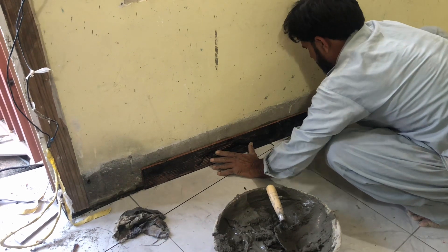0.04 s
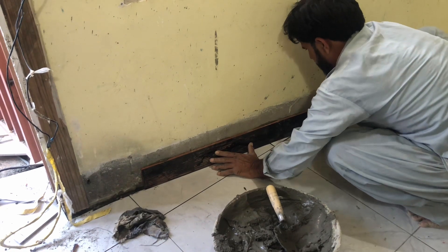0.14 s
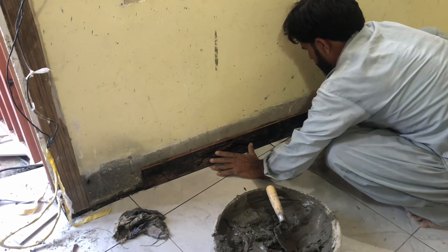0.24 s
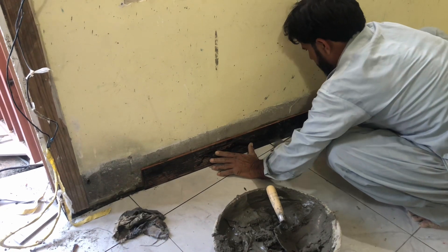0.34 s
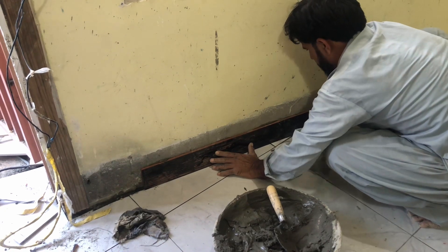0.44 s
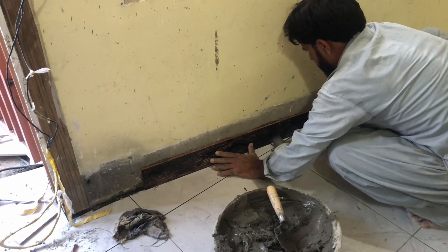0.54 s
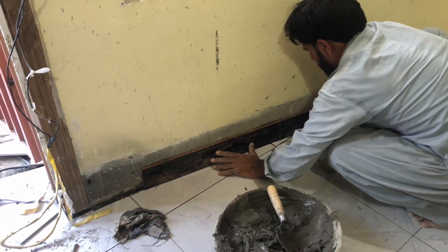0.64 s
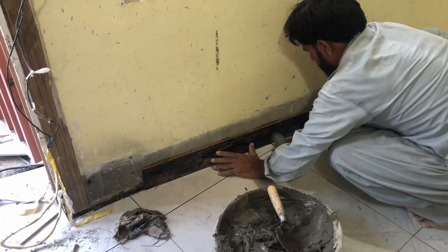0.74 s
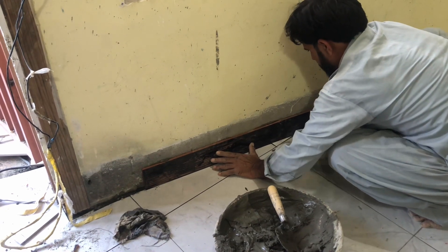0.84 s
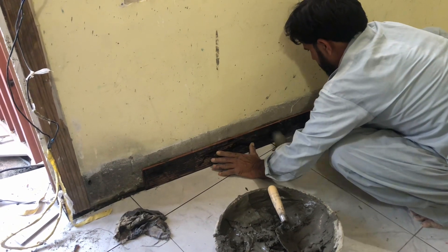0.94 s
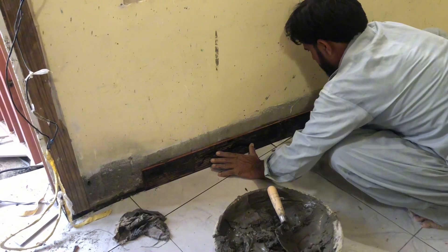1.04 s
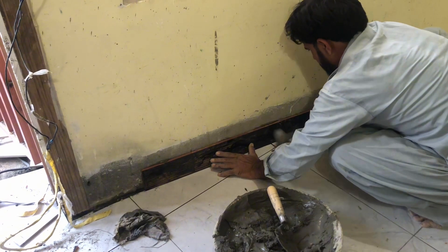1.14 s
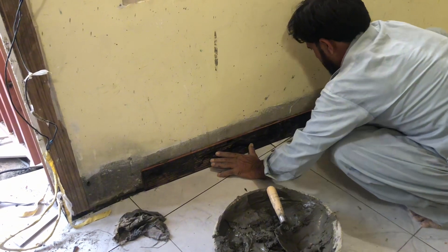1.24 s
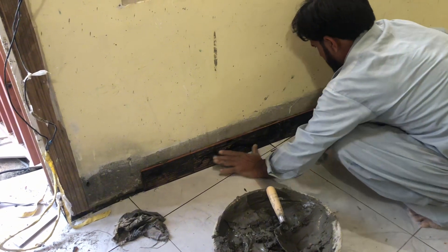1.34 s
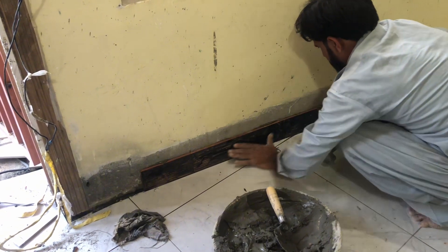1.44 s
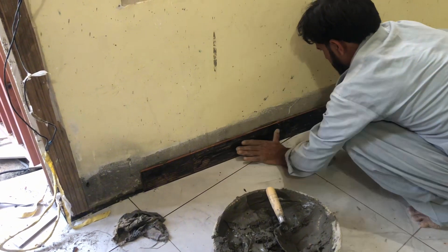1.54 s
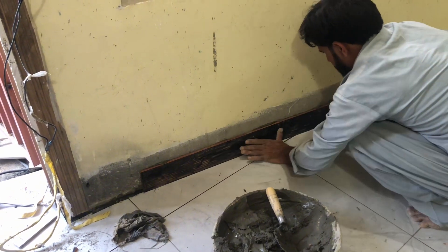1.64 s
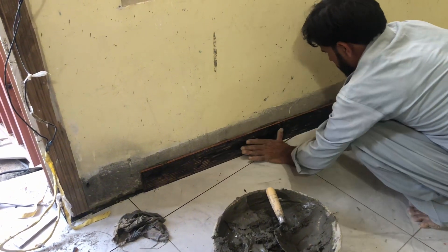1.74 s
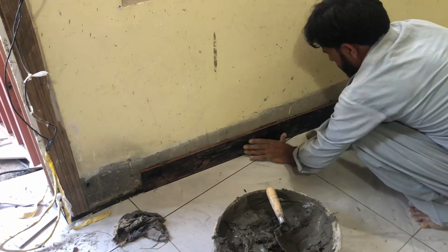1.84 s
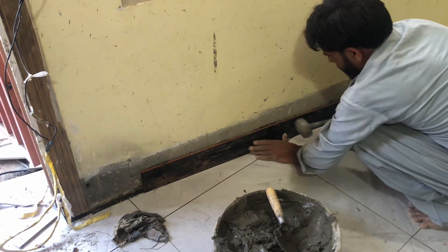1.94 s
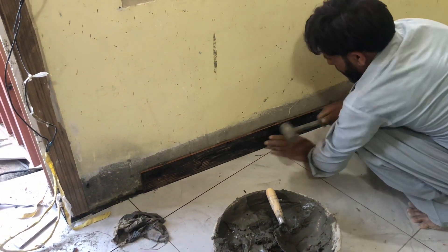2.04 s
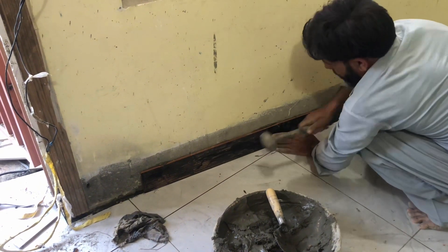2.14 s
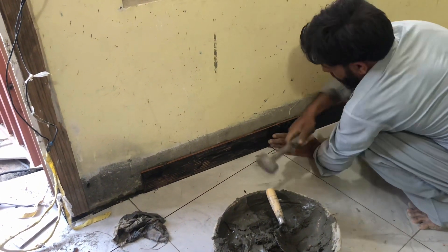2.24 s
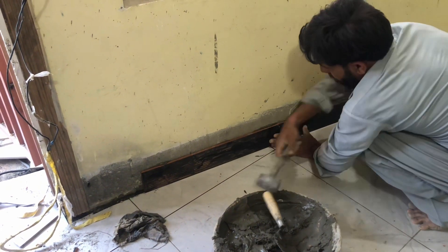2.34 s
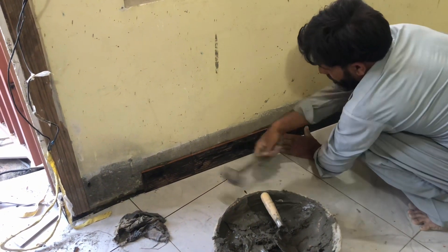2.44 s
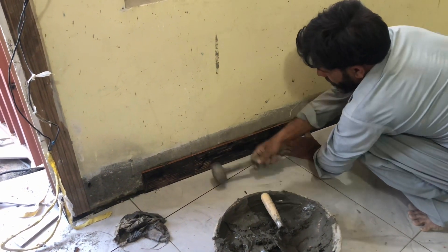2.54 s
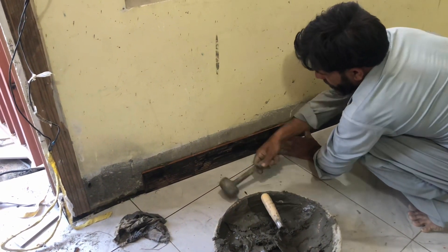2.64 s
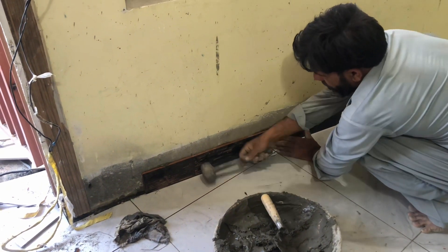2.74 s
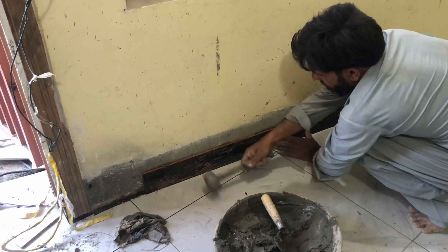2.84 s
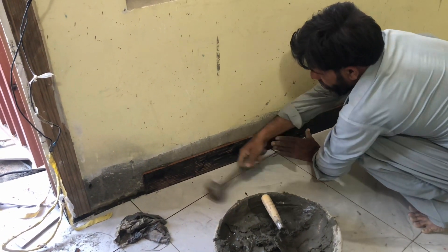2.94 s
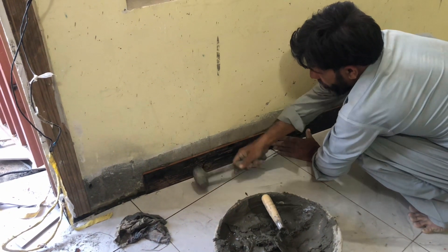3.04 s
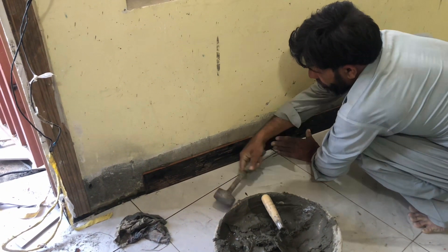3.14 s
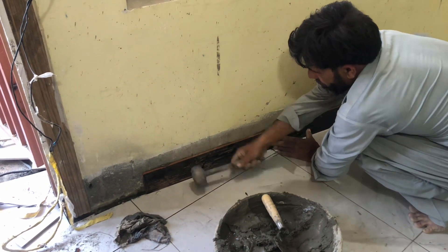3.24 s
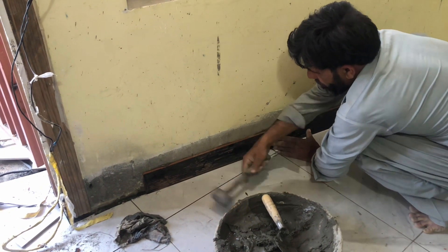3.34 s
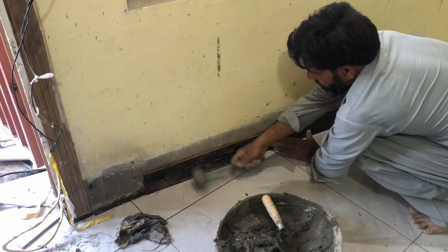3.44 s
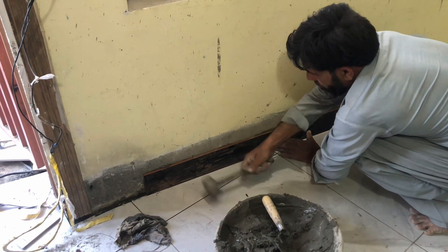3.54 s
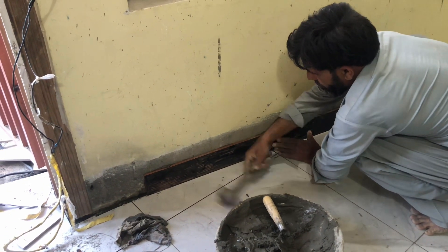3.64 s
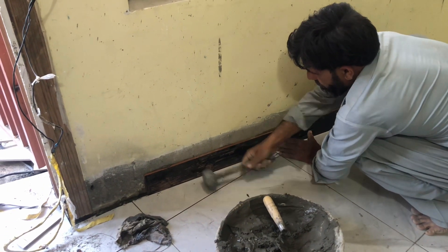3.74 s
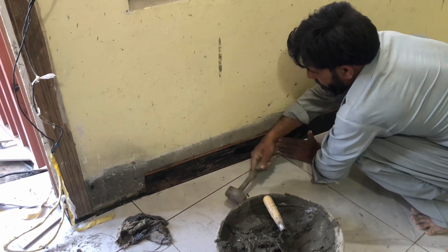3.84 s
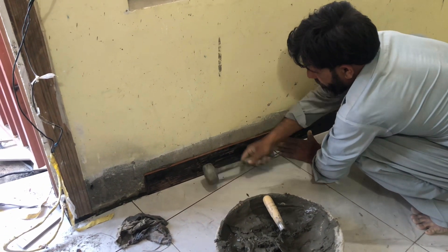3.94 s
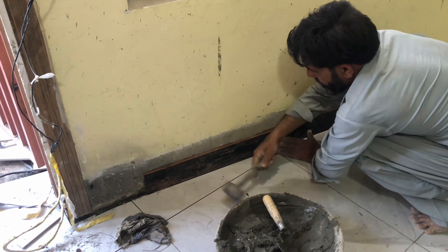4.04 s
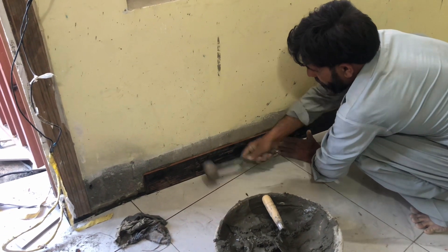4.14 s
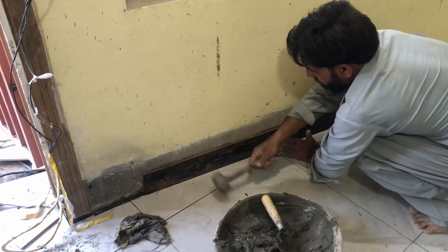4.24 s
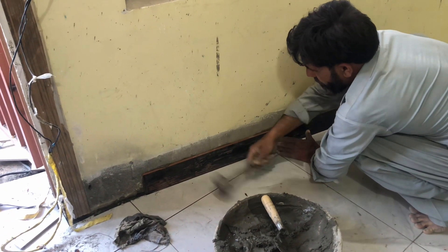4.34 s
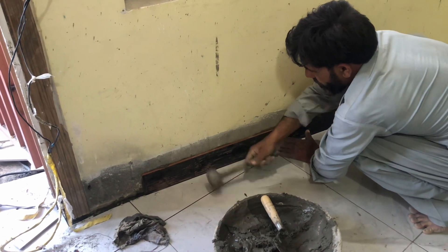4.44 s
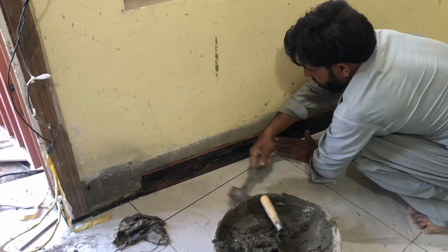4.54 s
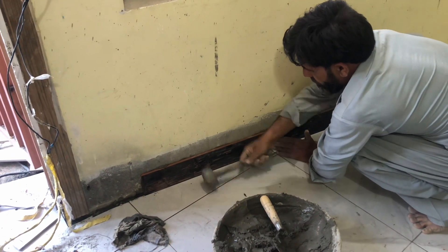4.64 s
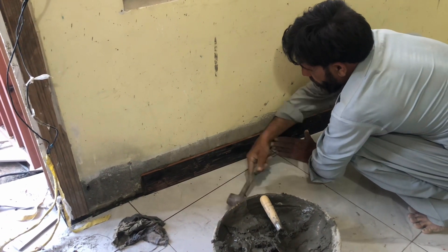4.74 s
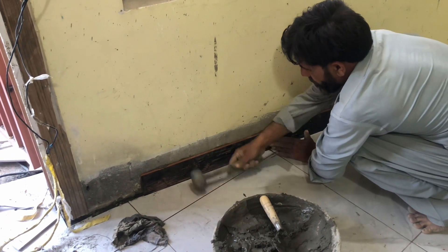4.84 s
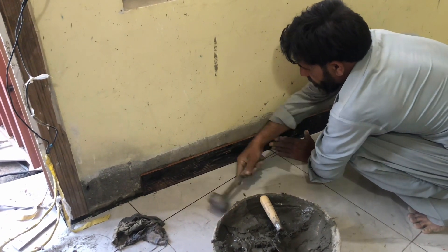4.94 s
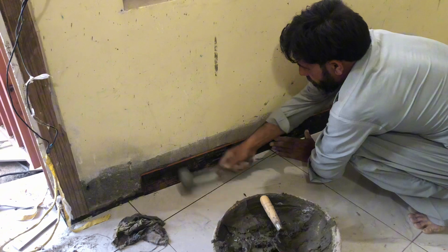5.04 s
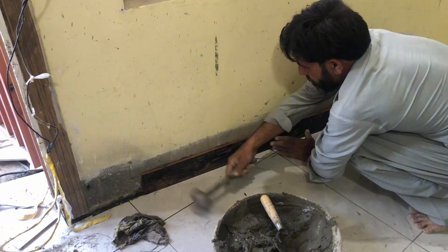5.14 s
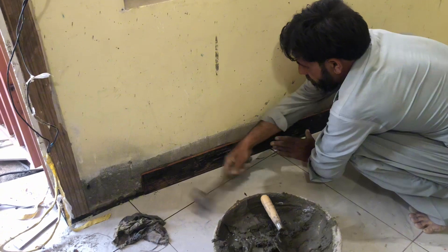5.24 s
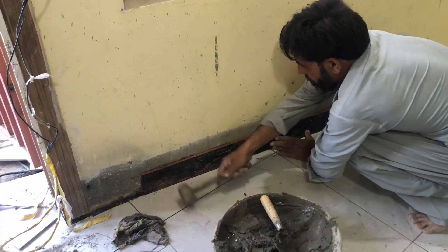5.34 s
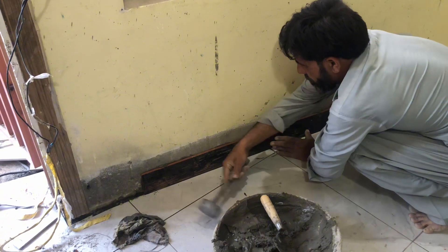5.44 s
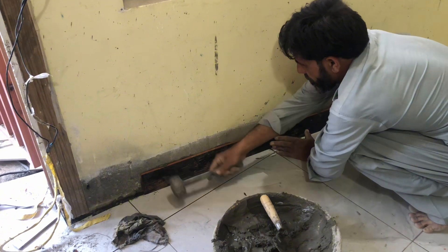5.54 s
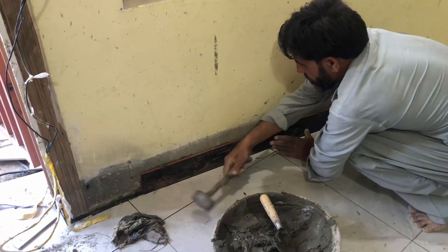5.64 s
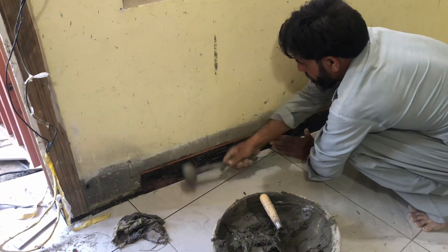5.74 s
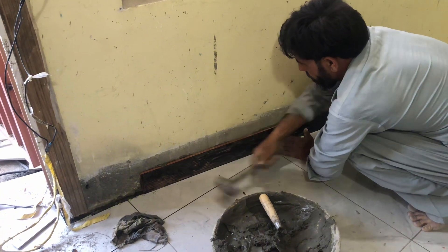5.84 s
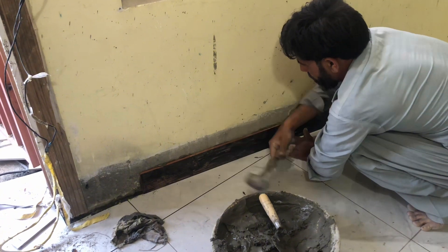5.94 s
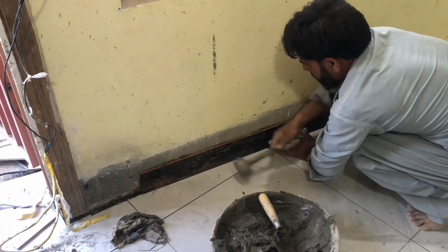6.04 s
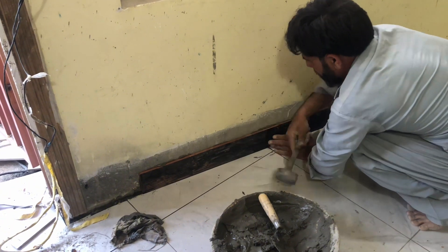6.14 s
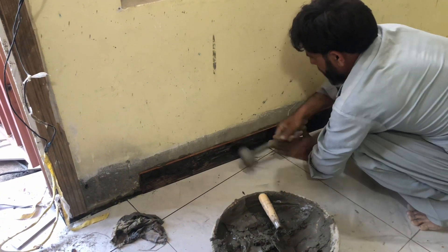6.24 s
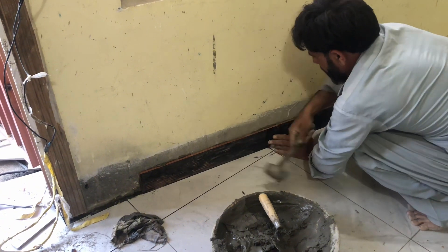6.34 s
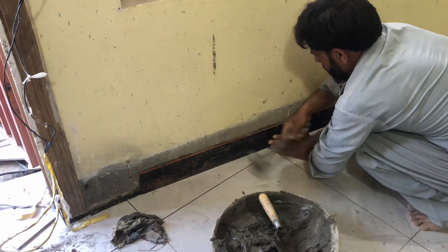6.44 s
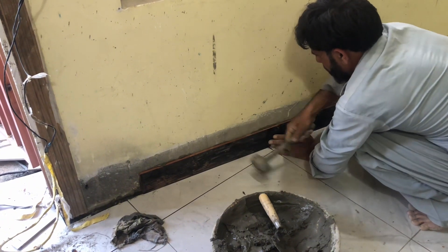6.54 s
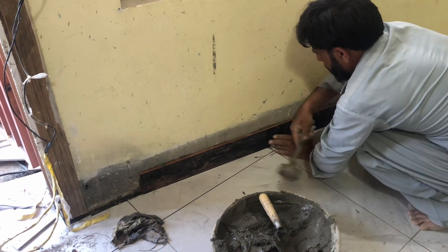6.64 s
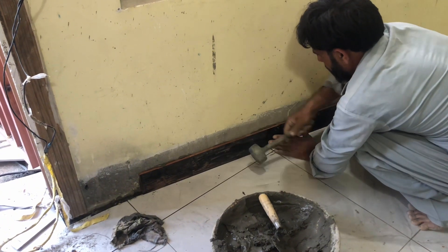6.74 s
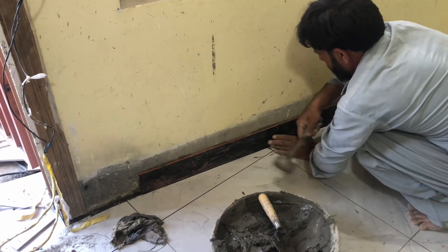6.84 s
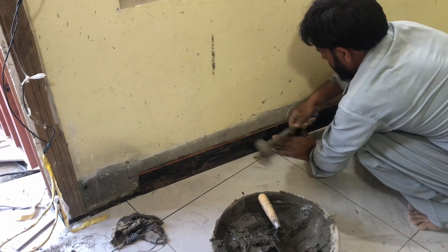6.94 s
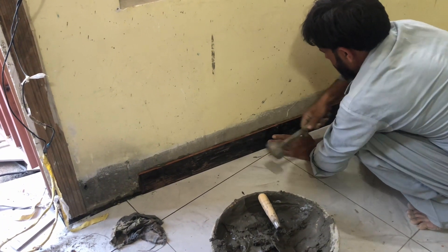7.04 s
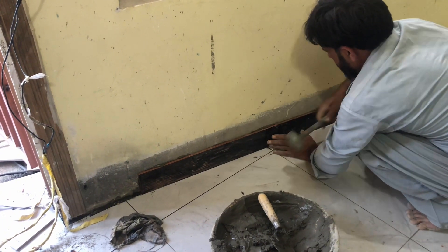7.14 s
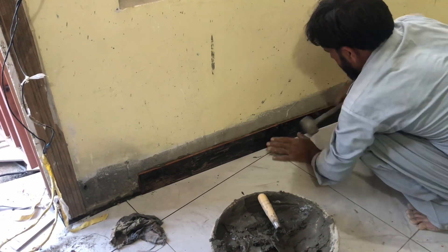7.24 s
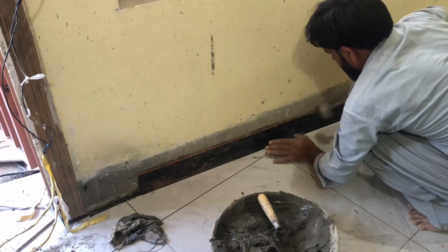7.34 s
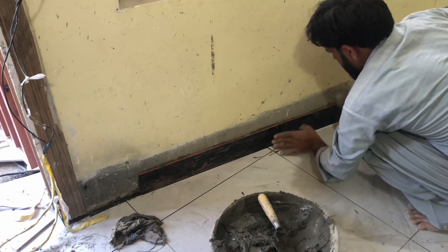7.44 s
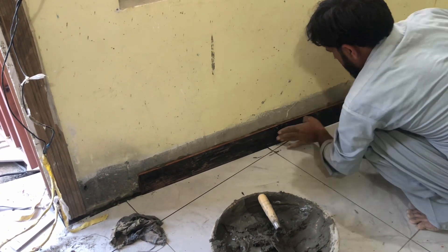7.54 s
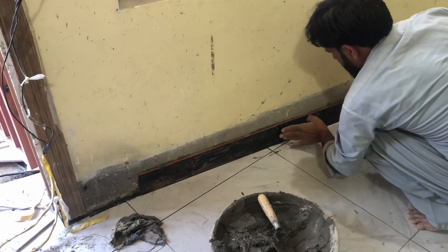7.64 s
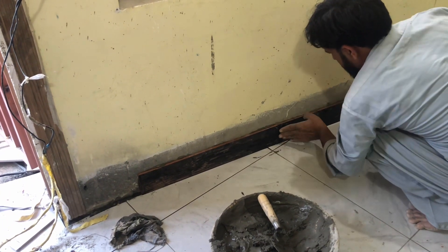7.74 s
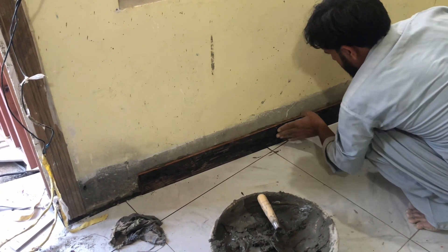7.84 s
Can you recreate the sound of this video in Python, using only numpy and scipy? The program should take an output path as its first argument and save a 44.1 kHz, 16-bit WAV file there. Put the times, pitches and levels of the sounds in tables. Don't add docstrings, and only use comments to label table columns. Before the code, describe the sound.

In a bare, echoing room, a hammer taps a tile strip low on the wall. Six lighter taps come first, then a pause with cloth rustle, small grit ticks and faint outdoor sparrows. A longer, heavier run of about twenty even blows follows, strongest mid-run and lighter toward the end, then the reverberation fades into rustle and distant chirps. Close phone microphone, faint town hum and hiss.

```python
import sys
import numpy as np
from scipy import signal
from scipy.fft import rfft, irfft
from scipy.io import wavfile
from scipy.ndimage import uniform_filter1d

SR = 44100
rng = np.random.default_rng(int(sys.argv[2]) if len(sys.argv) > 2 else 0)


def ratio(d):
    e = np.asarray(d, float) / 20
    return 10 ** e


def waveform_to_disk(signal):
    frames = np.transpose(np.atleast_2d(signal))
    scaled = np.clip(frames, -1, 1) * 32767
    samples = np.round(scaled).astype(np.int16)
    wavfile.write(sys.argv[1], SR, samples)


N = 347939
LEAD = SR
BLOW_SAMPLES = 2048
HISS_TOP_HZ = 15800
# delay_ms, near_end_db, far_end_db
ECHOES = [(3.3, -9, -14), (10.6, -8, -14), (14.2, -6, -11), (19.5, -12, -15), (25.5, -18, -15),
          (28.5, -18, -20), (31.6, -15, -4), (35.5, -22, -13), (44.5, -30, -13), (65, -30, -10)]


def shape(x, points):
    hz, db = np.transpose(points)
    f = np.arange(len(x) // 2 + 1) * SR / len(x) + 1
    gain_db = np.interp(np.log(f), np.log(hz), db, left=-60, right=-60)
    return irfft(rfft(x) * ratio(gain_db), len(x))


def unit(x):
    return x / np.sqrt(np.mean(x ** 2))


def band(x, lo_hz, hi_hz):
    return signal.sosfilt(signal.butter(2, [lo_hz, min(hi_hz, SR * .45)], "band", fs=SR, output="sos"), x)


def treble_edge(x):
    return signal.sosfilt(signal.ellip(6, .5, 50, HISS_TOP_HZ, fs=SR, output="sos"), x)


def add(track, start_s, sound):
    i = LEAD + int(start_s * SR)
    n = min(len(sound), len(track) - i)
    track[i:i + n] += sound[:n]


def decay(t60_s, t):
    return np.exp(-np.log(1000) * t / t60_s)


def ring(hz, t60_s, t):
    return np.sin(2 * np.pi * hz * t) * decay(t60_s, t)


def smear(dry_track, diffuse_db, t60_s, direct):
    t = np.arange(SR // 2) / SR
    answer = ratio(diffuse_db) * rng.standard_normal(len(t)) * decay(t60_s, t)
    if direct:
        answer[0] = 1
    return signal.fftconvolve(dry_track, answer)[LEAD:LEAD + N]


def murmur_of_town():
    # hz, db_per_hz
    floor_colour = [(24, -26), (40, 0.5), (84, 3), (495, -8), (650, -14), (727, -10), (1020, -9),
                    (1720, -21), (4070, -22), (6860, -30.5), (9000, -37), (11700, -45), (19800, -120)]
    floor_db, hiss_db = -67, -77.5
    swell = uniform_filter1d(rng.standard_normal(N // 4000 + 1).repeat(4000)[:N], 6000)
    town = ratio(floor_db + 8.5 + 1.5 * swell) * unit(shape(rng.standard_normal(N), floor_colour))
    return town + ratio(hiss_db) * treble_edge(rng.standard_normal(N))


def sparrows():
    # start_s, length_s, start_hz, end_hz, level_db
    chirps = [(1.7, 0.038, 4930, 4430, -67), (1.762, 0.038, 3870, 4100, -63), (1.82, 0.06, 4600, 4470, -59),
              (1.83, 0.088, 4300, 3210, -58), (2.075, 0.038, 5800, 5190, -54.5),
              (2.1, 0.065, 4900, 3600, -59), (2.165, 0.044, 4600, 3820, -59), (2.561, .09, 6400, 4800, -59),
              (2.83, .06, 6400, 5100, -62), (3.176, 0.04, 6100, 5640, -60), (5.71, .05, 5700, 5300, -65),
              (7.25, 0.043, 4800, 4600, -58), (7.27, 0.11, 4300, 3387, -62), (7.45, 0.14, 4600, 3580, -68),
              (7.8, 0.067, 5000, 4300, -64.5), (7.864, 0.035, 6350, 5570, -64)]
    trill_hz, trill_depth_hz = 90, 330
    birds = np.zeros(LEAD + N)
    for start_s, length_s, start_hz, end_hz, level_db in chirps:
        u = np.linspace(0, 1, int(length_s * SR))
        trill = trill_depth_hz * np.sin(2 * np.pi * trill_hz * length_s * u)
        hz = start_hz + (end_hz - start_hz) * u + trill
        swell = np.sin(np.pi * u) ** .5
        add(birds, start_s, ratio(level_db) * swell * np.sin(2 * np.pi * np.cumsum(hz) / SR))
    return smear(birds, -30, 0.51, direct=False)


def grit_ticks():
    # start_s, level_db, centre_hz
    ticks = [
        (1.4179, -37, 1500),
        (1.5014, -43, 1500),
        (2.328, -44, 1897),
        (2.38, -40, 1730),
        (2.4106, -37, 1700),
        (2.429, -39, 1680),
        (2.445, -36.5, 1770),
        (2.4613, -49, 1710),
    ]
    t = np.arange(600) / SR
    track = np.zeros(LEAD + N)
    for start_s, level_db, centre_hz in ticks:
        grit = 0.96 * band(rng.standard_normal(len(t)), 220, 9500) * np.exp(-t / 0.0014)
        add(track, start_s, ratio(level_db - 11.0) * (ring(centre_hz, .01, t) + grit))
    return smear(track, -22.5, 0.12, direct=True)


def rustle():
    # start_s, length_s, level_db
    strokes = [(1.313, 0.43, -65), (1.756, 0.23, -69), (1.913, 0.25, -61), (2.08, 0.27, -71),
               (2.322, .03, -67), (2.33, 0.19, -66), (4.612, .17, -68), (5.285, 0.12, -68.5),
               (5.515, 0.13, -66), (7.128, 0.13, -70), (7.18, 0.32, -76), (7.442, 0.25, -68),
               (7.618, 0.24, -84), (7.82, 0.084, -72.5)]
    # hz, db_per_hz
    rustle_colour = [(500, -16), (1500, 4), (4000, 5), (8000, 3), (12000, 6), (15600, 8), (15850, -25)]
    attack_s, release_s, sag_db_per_s = 0.067, 0.074, -13
    t = np.arange(N) / SR
    gain = np.zeros(N)
    for start_s, length_s, level_db in strokes:
        rise = (t - start_s) / min(attack_s, length_s / 2)
        fall = (start_s + length_s - t) / min(release_s, length_s / 2)
        envelope = np.clip(np.minimum(rise, fall), 0, 1) ** 1.34
        gain += ratio(level_db + sag_db_per_s * np.clip(t - start_s, 0, length_s)) * envelope
    grain_db = 1.3 * rng.exponential(size=N // 40 + 1).repeat(40)[:N]
    grains = rng.standard_normal(N) * ratio(grain_db)
    return ratio(3.5) * gain * unit(shape(grains, rustle_colour))


def tail():
    # hz, t60_s, level_db
    diffuse = [(65, 1.1, -40), (116, 1.6, -36), (183, 2.55, -38.5), (262, 2.8, -44.5), (347, 1.77, -35),
               (500, 1.88, -33), (965, 1.51, -39), (1500, 1.46, -39.5), (2200, 1.21, -40),
               (3980, 1.2, -41.5), (8000, 0.68, -41.5), (14400, 0.3, -42), (16000, 0.2, -48)]
    # hz, level_db, t60_s
    room_modes = [(71.6, -43, 1.2), (112.4, -51, 0.96), (151.75, -39.5, 1.42), (177.5, -45, 0.91),
                  (206, -66, 0.64), (242, -56.5, 2.4), (284.3, -47, 1.22), (309.9, -42.5, 0.59),
                  (353.6, -44.5, 1.03), (400, -57, 0.31)]
    t = np.arange(int(2.2 * SR)) / SR
    out = np.zeros(len(t))
    for mode_hz, level_db, t60_s in room_modes:
        out += ratio(level_db - 13.5) * ring(mode_hz, min(t60_s, 2.6), t)
    build = 1 - np.exp(-(t / .011) ** 2)
    build = build * (1 + 1.48 * np.exp(-t / 0.024))
    hz, t60s, levels_db = np.transpose(diffuse)
    for centre_hz in 64 * 2 ** np.arange(0, 8.3, .5):
        level_db = np.interp(np.log(centre_hz), np.log(hz), levels_db)
        t60_s = np.interp(np.log(centre_hz), np.log(hz), t60s)
        noise = band(rng.standard_normal(len(t)), centre_hz * 2 ** -.25, centre_hz * 2 ** .25)
        out += ratio(level_db) * build * noise * decay(t60_s, t)
    return treble_edge(out)


def room(thuds, spread, echo_db):
    early = np.zeros(SR // 10)
    early[(np.array(ECHOES)[:, 0] * SR / 1000).astype(int)] = ratio(echo_db)
    echoes = signal.fftconvolve(thuds, early)[:len(thuds)]
    dulled = signal.lfilter([.2], [1, -.8], echoes)
    return thuds + dulled + signal.fftconvolve(spread, tail())[:len(thuds)]


def crack(crack_db, top_db, knock_db, noise, luck):
    t = np.arange(len(noise)) / SR
    colour = np.array([
        (700, knock_db + 21), (1200, knock_db + 18.5), (1800, knock_db + 14.5),
        (2700, (crack_db + knock_db) / 2 - 0.5),
        (3800, crack_db - 9.0), (5200, crack_db - 8.5), (6800, crack_db - 13),
        (9000, top_db + 0.5), (12000, top_db - 1), (15200, top_db), (16300, top_db - 10)])
    colour[:, 1] += 2.5 * luck
    burst = (1 - np.exp(-t / .0003)) * (np.exp(-t / .0012) + .13 * np.exp(-t / .009))
    click = np.sqrt(np.sum(burst ** 2)) * (t == 0)
    return ratio(13.5) * burst * shape(noise, colour), ratio(13.5) * shape(click, colour)


def swing(hz, crest_s, rise_s, fall_s, t):
    u = t - crest_s
    glide = u - .35 * rise_s * (np.exp(-u / rise_s) - 1) * np.exp(-crest_s / rise_s / 2)
    top = u - .15 / hz
    envelope = np.exp(np.where(top < 0, -(top / rise_s) ** 2, -top / fall_s))
    return envelope * np.cos(2 * np.pi * hz * glide)


def thud(thud_db, bedded_hz, hollow_db, hollow_hz, far):
    t = np.arange(BLOW_SAMPLES) / SR
    lag_s, fall_s = (.0045 if far else .0038), .003
    bedded = ratio(4.5) * swing(bedded_hz, lag_s, 0.0019, fall_s, t)
    hollow = -ratio(hollow_db + 12) * swing(hollow_hz, lag_s - .0009, .0016, fall_s / 2.5, t)
    between = -ratio(2 * hollow_db / 3 + 7.5) * swing(502, lag_s - .001, 0.0021, fall_s / 2, t)
    deep = ratio(4.5 if far else 1.5) * swing(185.7, lag_s + 0.00013, 0.004, 0.0019, t)
    upper = ratio(hollow_db + 0.5) * swing(1.74 * hollow_hz, lag_s - .0016, 0.00066, fall_s / 3.3, t)
    return ratio(thud_db) * np.array([bedded, hollow, between, deep, upper])


def taps():
    # start_s, thud_db, crack_db, top_db (against the crack)
    blows = [(0.1006, -25.5, -20, -22), (0.3251, -25.5, -19.5, -18.5), (0.5336, -25.5, -23.5, -16),
             (0.7433, -25, -23.5, -20), (0.9528, -27.5, -23, -10.5), (1.1564, -26.5, -25, -20),
             (2.504, -22, -24, -17.5), (2.7564, -16, -29.5, -17.5), (2.9935, -16.5, -24, -18.5),
             (3.2253, -15.5, -25, -17), (3.4644, -12.5, -20, -17), (3.7, -11.5, -20, -19.5),
             (3.928, -13, -23.5, -18), (4.162, -13.5, -21.5, -15), (4.386, -14, -22, -18),
             (4.618, -10.5, -18.5, -14.5), (4.8391, -11.5, -19.5, -21), (5.0652, -15.5, -24.5, -21),
             (5.2977, -14.5, -23.5, -20.5), (5.528, -17, -23, -21), (5.762, -17, -28, -14),
             (6.0135, -18.5, -23.5, -19.5), (6.2466, -21, -21, -16.5), (6.4771, -21, -21.5, -13),
             (6.7196, -19.5, -17, -14), (6.9502, -23, -22.5, -19)]
    # time_s, bedded_hz, hollow_hz, hollow_db (against bedded), knock_db (against crack)
    spots = [(0.3, 315, 825, 1, -23), (0.75, 290, 840, 1, -10.5), (2.2, 304, 820, -1.5, -5),
             (2.52, 285, 760, -13, -23.5), (2.74, 310, 830, -23, -22), (3.8, 330, 770, -28, -17.5),
             (4.7, 345, 880, -23.5, -25.5), (5.1, 283, 810, -26, -19), (5.78, 288, 774, -25, -18.5),
             (6.01, 374, 640, -13.5, -18), (6.24, 328, 747, -4, -23), (6.95, 346, 773, -4, -25.5)]
    # start_s, end_s
    far_end_s = (2.4, 5.9)
    thuds, spread = np.zeros((2, 2, LEAD + N))
    grit = np.zeros(LEAD + N)
    when_s, *spot = np.transpose(spots)
    for start_s, thud_db, crack_db, top_db in blows:
        far = int(far_end_s[0] < start_s < far_end_s[1])
        bedded_hz, hollow_hz, hollow_db, knock_db = (np.interp(start_s, when_s, v) for v in spot)
        noise, luck = rng.standard_normal(BLOW_SAMPLES), rng.standard_normal(11)
        direct, smooth = crack(crack_db, crack_db + top_db, crack_db + knock_db, noise, luck)
        modes = thud(thud_db, bedded_hz, hollow_db, hollow_hz, far)
        power = np.sum(abs(rfft(np.vstack([modes, smooth]))) ** 2, axis=0)
        push = np.roll(irfft(np.sqrt(power)), BLOW_SAMPLES // 8)
        hit_s = start_s + .0008
        add(grit, hit_s, direct)
        times_s = [hit_s, hit_s - .645] if hit_s < .6 else [hit_s]
        for at_s in times_s:
            add(thuds[far], at_s, modes.sum(axis=0))
            add(spread[far], at_s, push)
    echo_db = np.array(ECHOES)[:, 1:].T
    heard = (grit + sum(map(room, thuds, spread, echo_db)))[LEAD:]
    return signal.sosfilt(signal.butter(6, 64, "high", fs=SR, output="sos"), heard)


def scene():
    return (murmur_of_town() + sparrows() + grit_ticks() + rustle() + taps())[None]


def low_pass(x):
    return signal.sosfilt(signal.butter(12, 17040, fs=SR, output="sos"), x)


def record(dry):
    rounded = np.tanh(1.1 * dry) / 1.1
    edged = signal.sosfilt(signal.ellip(4, .3, 18, 16000, fs=SR, output="sos"), rounded)
    return low_pass(edged)


dry = scene()
out = record(dry)
waveform_to_disk(out)
```